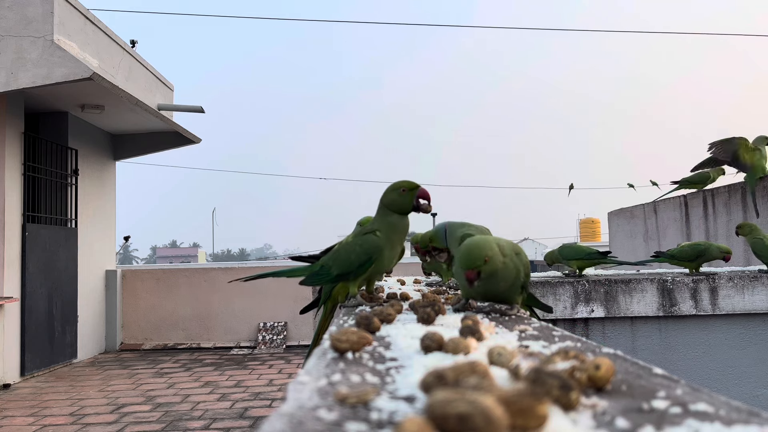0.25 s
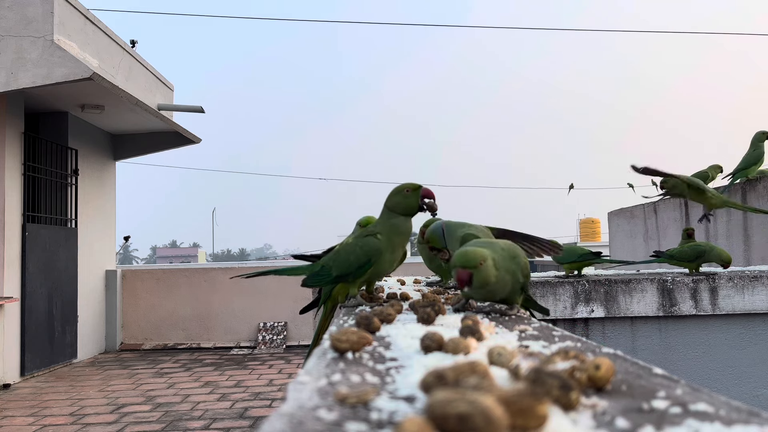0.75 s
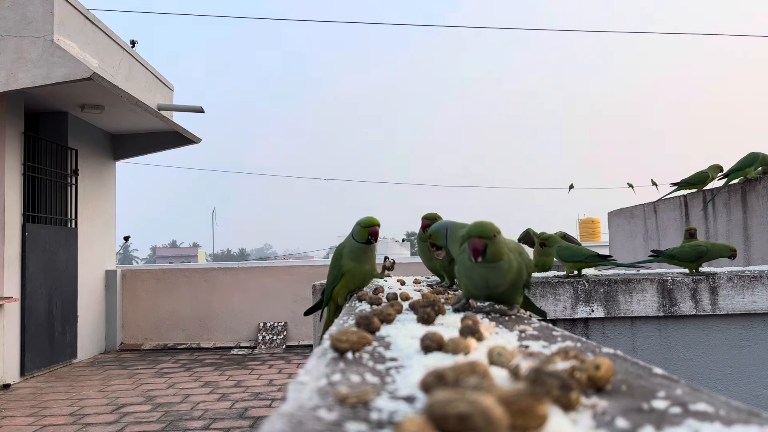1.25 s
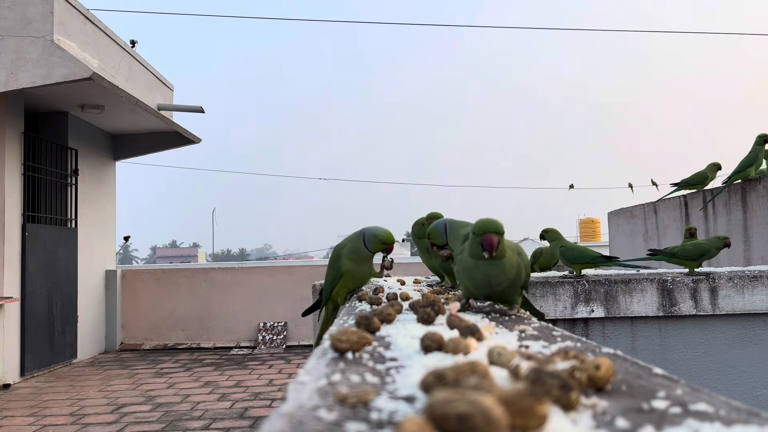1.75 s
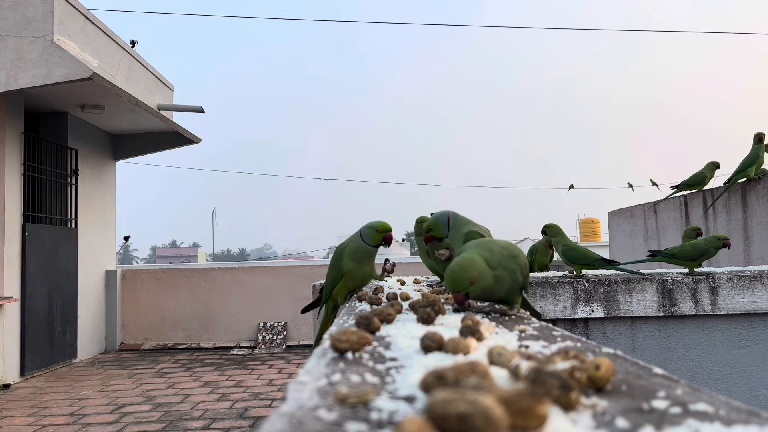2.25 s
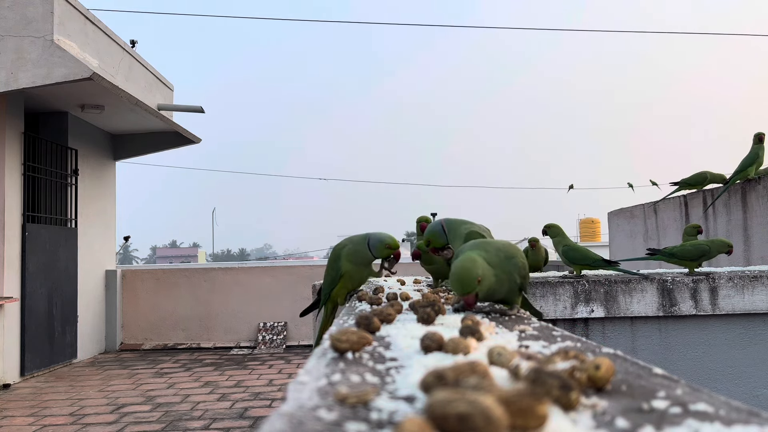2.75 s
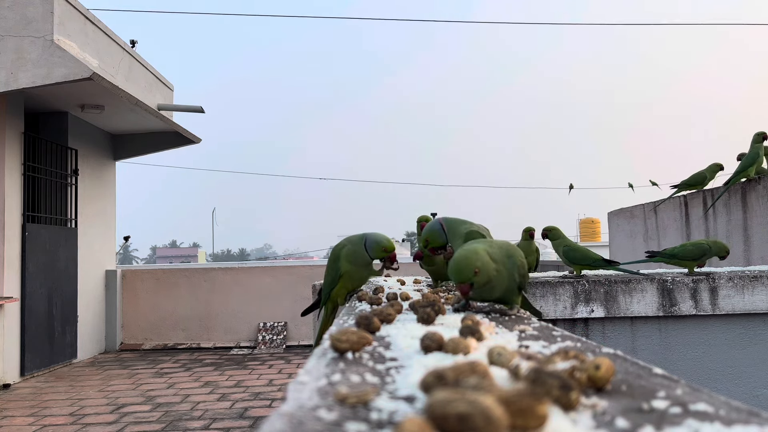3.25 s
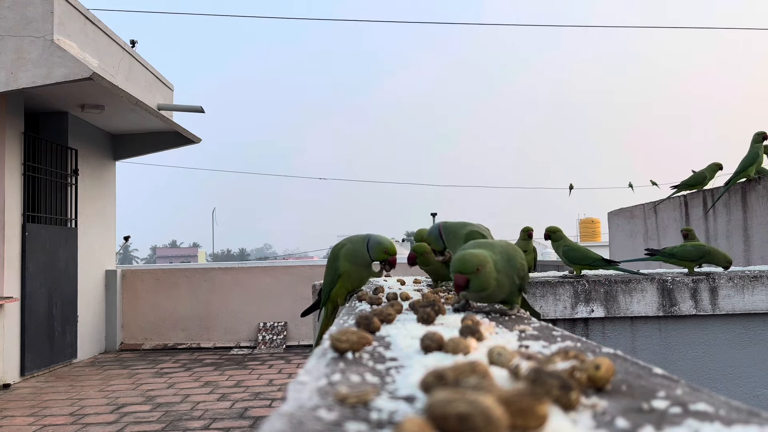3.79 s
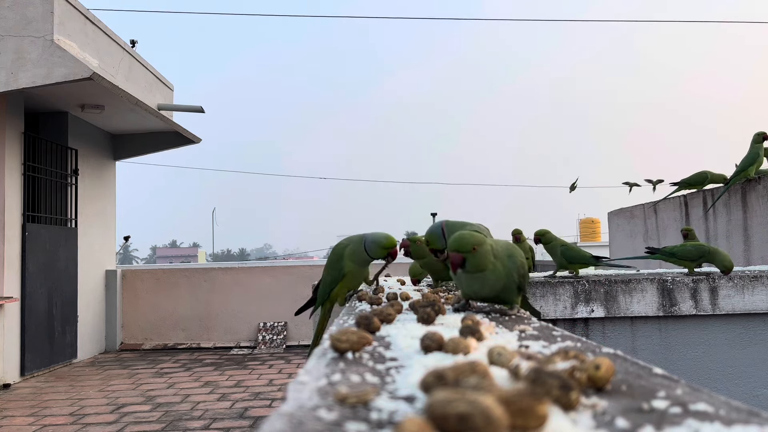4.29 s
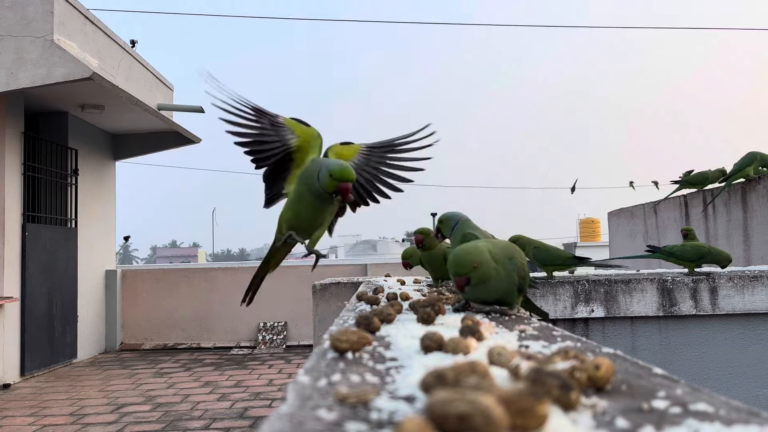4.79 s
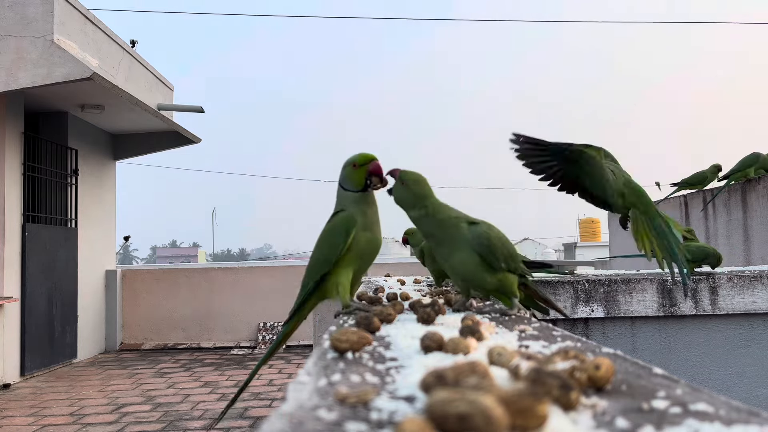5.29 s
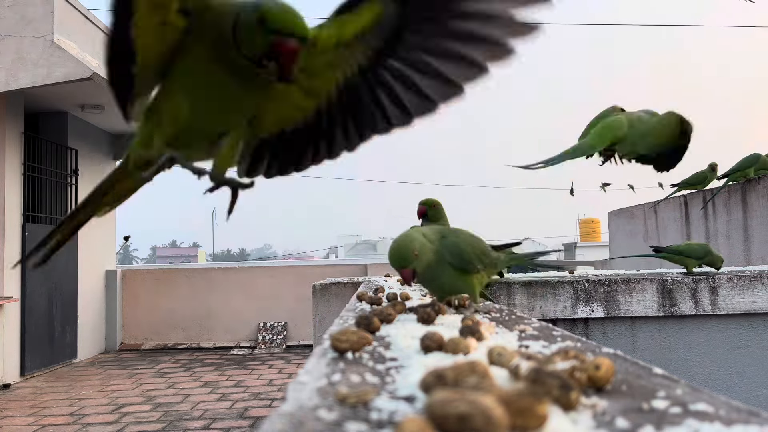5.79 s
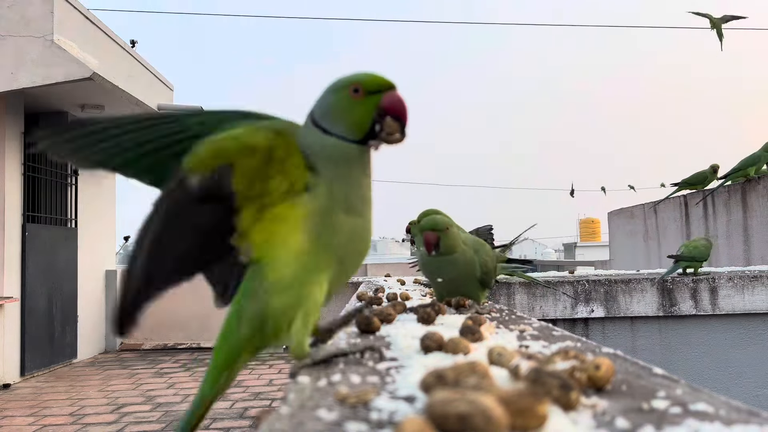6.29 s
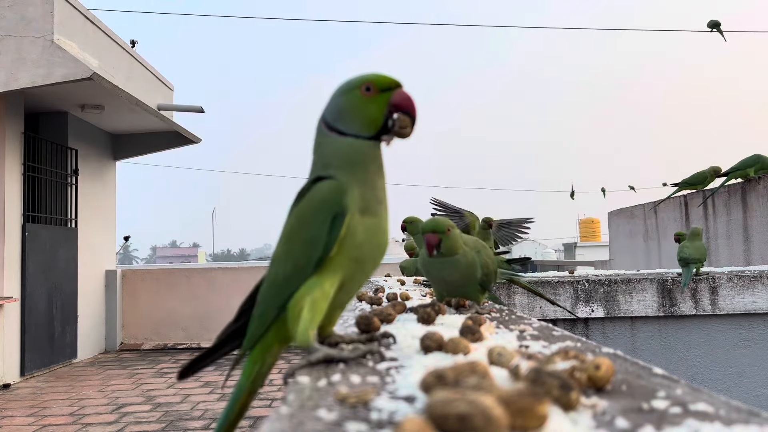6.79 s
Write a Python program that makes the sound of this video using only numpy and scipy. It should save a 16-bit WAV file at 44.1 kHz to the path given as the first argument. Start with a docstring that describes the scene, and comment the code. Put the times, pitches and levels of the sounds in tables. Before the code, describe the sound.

Parakeets feeding on a rooftop crack nuts and give harsh rattling squawks, with wing flurries and a burst of piercing screams near the end.

```python
"""A town hums under a lumpy draught; a brief falling croak, far chirps and beak cracks follow, then parakeets.
Squawks are bursts of throat-coloured partials and breath; whistles and croaks are gliding, blurred tones.
Cracks and knocks are decaying noise and sines; wings, feathers, draught and hum are patchy stereo noise.
Echoes and decaying noise tails answer for the walls; two microphone ports hear near sounds unequally."""
import sys
import numpy as np
from scipy import signal
from scipy.fft import rfft, irfft, next_fast_len
from scipy.io import wavfile
from scipy.ndimage import uniform_filter1d, map_coordinates

SR = 44100
rng = np.random.default_rng(int(sys.argv[2]) if len(sys.argv) > 2 else 0)


def unload_audio(sound):
    """Save the sound as a 16-bit wav file, at the path given as the first command line argument."""
    columns = np.transpose(np.atleast_2d(sound))
    # keep every value between -1 and 1, then stretch to whole-number steps
    steps = np.round(np.clip(columns, -1, 1) * 32767)
    wavfile.write(sys.argv[1], SR, steps.astype(np.int16))


N = 310464  # samples

# Gusts and wing draught: (time [s], relative level [dB])
DRAUGHT_LEVELS = [(0, -47.5), (.6, -68), (1.06, -37.5), (1.45, -46.5), (1.56, -40), (1.74, -61),
                  (1.88, -41), (2.16, -56.5), (4.41, -50), (4.78, -39.5), (5.2, -47.5), (5.43, -40.5),
                  (5.61, -38.5), (5.84, -29.5), (5.9, -41), (6.14, -40), (6.31, -41), (7.04, -50)]
# Feather rustle: (time [s], level before flutter [dB])
RUSTLE_LEVELS = [(0, -56), (.3, -70), (.62, -70.5), (.9, -61.5), (1.4, -55), (2.2, -69), (2.801, -69),
                 (3.3, -65.5), (4.3, -67), (4.6, -56.5), (5.2, -61), (5.7, -54.5), (6.7, -55.5),
                 (7.04, -58)]
# Noise spectra: (frequency [Hz], relative density [dB per Hz])
TOWN_SPECTRUM = [(35, -69), (60, 2.5), (172, -5), (228, -5.5), (495, -13), (783, -13.5), (937, -15.5),
                 (1400, -19), (2000, -29.5), (2640, -26), (3090, -18.5), (3850, -35), (4700, -19.5),
                 (7000, -103), (15400, -120)]
DRAUGHT_SPECTRUM = [(15, -12), (30, -3.5), (55, 8), (85, -1), (125, -3.5), (250, -10.5), (450, -60)]
FEATHER_SPECTRUM = [(300, -52), (1500, 14), (4500, 13.5), (6200, -2), (8500, 11), (10300, -11.5),
                    (12500, 9), (14000, -11), (16000, -55)]
WING_AIR_SPECTRUM = [(150, 5.5), (600, 9), (1500, 2), (4000, -15)]
BREATH_SPECTRUM = [(530, -68), (900, -16), (1460, -8), (1850, -13), (2400, 1), (3600, 6), (4200, 2),
                   (4700, -9), (5400, -17), (7320, -25), (10300, -30), (12900, -15), (15000, -37)]
# Left-right likeness of noise: (frequency [Hz], correlation [-1 to 1])
STEREO_LIKENESS = [(30, 1), (60, 0.97), (150, 1), (380, 0.73), (950, 0.37), (2400, 0.63), (6000, 0),
                   (15000, 0.22)]

# A falling croak, then whistled screams: ((roughness [rad], throb [dB]),
#   (odd partials [dB], left-right [dB]), rows of (time [s], pitch [Hz], level [dB]))
CROAK_AND_WHISTLES = [ ((0, 0), (0.93, -1), [(.002, 636, -67), (.025, 553, -49.5), (.055, 528, -71)]),
                      ((.24, 3), (-6, 0), [(5.83, 1473, -33), (5.843, 2166, -27.5), (5.855, 2185, -22.5),
                      (5.863, 1846, -30), (5.88, 1875, -27.5), (5.9, 1990, -29.5), (5.92, 1850, -35.5),
                      (5.93, 1663, -26), (5.952, 1633, -36.5)]), ((.22, 3), (-14, 0), [(5.86, 2130, -40),
                      (5.9, 2250, -29), (5.912, 2010, -38), (5.922, 1930, -40), (5.93, 2190, -34),
                      (5.945, 2250, -39)]), ((.18, 2.5), (-5, 0.57), [(6.06, 1894, -22), (6.071, 2260, -22),
                      (6.087, 2420, -28.5), (6.093, 2356, -25), (6.1, 2260, -21), (6.122, 2241, -22),
                      (6.145, 2127, -25.5), (6.168, 1913, -28.5), (6.187, 1450, -33)]), ((.13, 2),
                      (-1.3, -3.5), [(6.355, 1676, -35.5), (6.373, 2233, -28), (6.386, 2287, -24.5),
                      (6.4, 2320, -32), (6.415, 2351, -32), (6.44, 2264, -27.5), (6.455, 2110, -30),
                      (6.479, 1880, -32), (6.5, 1473, -34)]), ((.6, 4), (-3.1, -1.5), [(6.8, 1496, -33),
                      (6.812, 1478, -41), (6.82, 1900, -33), (6.83, 2520, -17.5)]), ((.1, 3.5), (8, 3),
                      [(6.824, 3360, -23), (6.853, 3216, -32.5), (6.864, 3085, -34), (6.93, 3170, -58)]),
                      ((.07, 1.5), (-4, -9), [(6.848, 2437, -21), (6.858, 2130, -35), (6.886, 2177, -28),
                      (6.897, 2095, -30.5), (6.905, 1996, -39), (6.928, 1976, -29.5), (6.966, 1398, -36)]),
                      ]
# Soft croaks: columns as CROAK_AND_WHISTLES
SOFT_CROAKS = [((0, 0), (0, 0), [(.72, 610, -49), (.765, 350, -52)]), ((0, 0), (0, 2), [(3.668, 680, -46),
               (3.682, 490, -44), (3.692, 460, -44), (3.704, 510, -45), (3.72, 800, -48)])]
# Throat colours: (frequency [Hz], relative gain [dB])
WHISTLE_THROAT = [(1400, -21), (2200, -12), (3400, 0), (4600, -1), (5300, -8), (6200, -16), (7300, -25),
                  (8700, -15), (9500, -20), (10300, -46), (14000, -52)]
CROAK_THROAT = [(300, -8), (500, -1), (1300, -1), (1800, -9), (2400, -18), (4000, -36)]
SQUAWK_THROAT = [(500, -7), (1500, 3), (2300, -3.5), (3100, 3.5), (3800, -4), (4700, -5), (6500, -20),
                 (8500, -9), (10300, -23.5), (12400, -18), (15000, -55)]
ATTACK_S, RELEASE_S = 0.01, 0.0085  # whistles and croaks

# Far chirps: (time [s], first pitch [Hz], level [dB])
CHIRPS = [(.069, 5076, -50), (0.625, 4900, -49), (1.279, 4830, -47), (2.05, 4835, -49),
          (4.086, 4900, -48.5)]
CHIRP_S, CHIRP_FALL_HZ = 0.084, 587
# Faint steady notes: (time [s], pitch [Hz], length [s], level [dB])
HOOTS = [(.1, 480, 0.046, -46), (0.403, 3340, 0.049, -56), (2.835, 3000, 0.12, -59),
         (4.33, 1350, 0.21, -53), (4.25, 906, 0.1, -55.5)]

# Beak cracks: (time [s], bright edge level [dB], relative ring [dB], relative body [dB])
CRACKS = [(0.164, -34.5, -4, -9), (1.093, -58.5, -2, 20), (1.244, -36.5, -4.5, -24),
          (1.297, -32.5, -1.5, -11.5), (1.404, -57, 17, 6), (2.607, -45.5, -44, 1), (2.7927, -28.5, 4, -37),
          (3.217, -53, 4, 11), (3.308, -51, 5.5, -12), (3.391, -48.5, 6, -6), (3.563, -34.5, -14, -5),
          (3.945, -43, 13, -28), (3.9786, -36, -0.5, -10), (6.619, -32.5, 2, -27), (6.6234, -35, 1, -18),
          (6.63, -43, 15, -2), (6.7856, -55, 14, 8)]
# Hollow beak resonances: (centre [Hz], width [Hz], relative gain [dB])
BEAK_MODES = [(2920, 410, 21), (4500, 295, 20.5)]
# Feet and nuts on the wall: (time [s], relative level [dB], ring pitch [Hz])
KNOCKS = [(0.444, -38.5, 254), (1.032, -30, 633), (1.28, -36.5, 600), (1.877, -42, 235),
          (2.173, -37.5, 226), (2.599, -41.5, 240), (3.385, -36.5, 247), (5.073, -29, 258),
          (5.549, -38.5, 222), (6.619, -33.5, 840)]
# Flights: (first stroke [s], last stroke [s], nominal rate [strokes/s], relative level [dB],
#   growth of low part [dB/stroke], treble [dB])
FLIGHTS = [(0.923, 1.171, 11.9, -29, 0, -9.5), (5.056, 5.344, 11.1, -42.5, 2.5, -3.5),
           (5.386, 5.469, 11.6, -28, -0.5, -15), (5.512, 5.805, 13.6, -30.5, 1, -34)]

# Squawks: (rhythm rows of (time [s], bursts so far),
#   voice (half-pitch partials at start [dB], at end [dB], treble [dB], breath [dB], pitch scatter [share]),
#   rows of (time [s], first partial [dB], pitch [Hz], upper partials [dB], burst sharpness))
SQUAWKS = [ ([(.964, 0), (1.096, 15)], (3.5, 5.5, -11, -11, .015), [(.968, -60, 1585, 2, 2.5),
           (1.0, -59, 1608, 7.5, 2.5), (1.09, -67.5, 1610, 6.5, 3.7)]), ([(1.446, 0), (1.485, 4),
           (1.601, 16), (1.779, 34), (1.843, 40)], (-5, -2.5, -4, 1.5, .03), [(1.459, -66, 1715, 19, 0.77),
           (1.51, -58.5, 1555, 17, 1), (1.56, -51.5, 1570, 19.5, 1.24), (1.625, -55, 1580, 25, 1.5),
           (1.68, -54, 1545, 22.5, 0.71), (1.79, -54.5, 1534, 16, 2.2), (1.84, -68, 1550, 1, 1.2)]),
           ([(2.8995, 0), (2.956, 6), (3.049, 16), (3.098, 21), (3.118, 23)], (-6, -4, -1, -1, .025),
           [(2.904, -66, 1634, 21, 2.1), (2.92, -54.5, 1590, 21, 2.1), (2.96, -49, 1602, 19.5, 1.4),
           (3.03, -53, 1561, 21.5, 2), (3.1, -59, 1562, 17, 3.7), (3.108, -75, 1570, 18, 1.4)]),
           ([(4.459, 0), (4.504, 6), (4.556, 14), (4.58, 17), (4.689, 32), (4.765, 42), (4.803, 46),
           (4.899, 56), (4.931, 59), (5.044, 68)], (-15, -7.5, -5.5, -8, .025),
           [(4.465, -57, 1332, -9, 0.94), (4.548, -55.5, 1421, -5, 0.94), (4.566, -48.5, 1475, 2, 1.9),
           (4.645, -51, 1447, 4.5, 2.4), (4.7, -54.5, 1373, 11.5, 0.63), (4.765, -52.5, 1311, 6.5, 0.67),
           (4.84, -49, 1366, 8.5, 1.15), (4.91, -51.5, 1240, 6, 2.3), (4.955, -49.5, 1095, -8, 6.2),
           (5.032, -57, 1038, -3, 3), (5.043, -83, 1014, -12, 2.5)]), ([(5.791, 0), (5.894, 13),
           (5.998, 25), (6.103, 37), (6.206, 47), (6.324, 59), (6.441, 70), (6.521, 77)],
           (-9.5, -9, -5, -11, .02), [(5.795, -48, 1352, -5, 5.1), (5.81, -51, 1415, 5, 0.88),
           (5.967, -45, 1335, 4.5, 4.9), (6.06, -50, 1060, -3.5, 4.8), (6.195, -46.5, 998.5, 2, 2.3),
           (6.49, -49.5, 1090, -5, 5.9), (6.515, -77, 990, -1, 1.3)]), ]
BURST_JITTER_CYCLES, BURST_SCATTER_DB, BURST_SKEW = .05, 1.4, .5  # skew 0-1: rise faster than fall
TONE_BLUR_RAD, BURST_GLIDE = 0.1, .03  # blur of first partial; pitch fall across a burst [share]

# Wall decay: (frequency [Hz], t60 before scaling [s])
WALL_DECAY = [(300, 0.34), (3000, 0.62), (6000, 0.54), (12000, 0.26)]
# Near sounds at the ports: (frequency [Hz], left-right [dB])
PORT_LEVEL = [(60, -1), (150, 4), (380, -6.5), (950, 3), (2380, -2.5), (5980, -3.5), (15000, 3)]
# Near sounds at the ports: (frequency [Hz], left lead [rad])
PORT_LEAD = [(1, 7.5), (700, -1.05), (2400, 1.5), (4200, -1.8), (5200, -1.5), (6800, -1.5), (9700, 2),
             (13400, 8), (16300, 10.5)]
SCREAM_ECHO_DB, SQUAWK_ECHO_DB = -3.5, -8
WALL_TOP_HZ, TOP_HZ = 9500, 16300


def amp(db):
    """Decibels to amplitude."""
    return 10 ** (np.asarray(db) / 20)


def unit(x):
    """Scale to rms 1."""
    return x / np.sqrt(np.mean(x ** 2) + 1e-20)


def along(points, hz):
    """Interpolate (Hz, value) points on a log axis."""
    f, v = np.transpose(points)
    return np.interp(np.log(hz + 1), np.log(f + 1), v)


def curves(rows):
    """First sample of a table, and one value per sample for each column."""
    s, *cols = np.transpose(rows)
    n = np.arange(round(s[0] * SR), min(round(s[-1] * SR), N + SR))
    return n[0], [np.interp(n / SR, s, c) for c in cols]


def wobble(rate_hz, size=N):
    """Smooth random curve, rate_hz knots a second."""
    knots = rng.standard_normal(int(size * rate_hz / SR) + 4)
    return map_coordinates(knots, [np.arange(size) * rate_hz / SR])


def filtered(x, response):
    """Apply a complex response of frequency."""
    m = next_fast_len(x.shape[-1] + 8192)
    spectrum = rfft(x, m) * response(np.fft.rfftfreq(m, 1 / SR))
    return irfft(spectrum, m)[..., :x.shape[-1]]


def add(track, first, x):
    """Mix x into track from sample first."""
    track[..., first:first + x.shape[-1]] += x


def rush(spectrum, patchy_db):
    """Stereo noise of rms 1, with random gain patches and partly shared channels."""
    z = signal.stft(rng.standard_normal((2, N)), nperseg=512)[2]
    field = uniform_filter1d(rng.standard_normal(z.shape[1:]), size=5, axis=0)
    field = uniform_filter1d(field, size=10, axis=1)
    pair = signal.istft(z * amp(patchy_db * unit(field)), nperseg=512)[1][:, :N]

    def mid_side(hz):
        turn = np.arccos(np.clip(along(STEREO_LIKENESS, hz), -1, 1)) / 2
        return amp(along(spectrum, hz)) * [np.cos(turn), np.sin(turn)]

    mid, side = filtered(pair, mid_side)
    return unit(np.array([mid + side, mid - side]))


def stack(hz, gains, blur_rad, blur_rate_hz):
    """Harmonics of a pitch whose phases wander, more so the higher they are."""
    k = np.arange(1, len(gains) + 1)[:, None]
    drift = np.array([wobble(blur_rate_hz, size=len(hz)) for _ in gains])
    wander = blur_rad * k * np.sqrt(k) * drift
    start = rng.uniform(0, 2 * np.pi, k.shape)
    phase = k * 2 * np.pi * np.cumsum(hz) / SR + start + wander
    return np.sum(gains * np.sin(phase), axis=0) * np.sqrt(2)


def background():
    """Town hum, lumpy low draught and the rustle of the flock, each shaped noise."""
    t = np.arange(N) / SR
    draught_db = np.interp(t, *np.transpose(DRAUGHT_LEVELS))
    rustle_db = np.interp(t, *np.transpose(RUSTLE_LEVELS))
    hum = amp(-50.0 + 0.41 * wobble(1.813)) * rush(TOWN_SPECTRUM, patchy_db=1.5)
    flutter_db = 2.2 * wobble(14) + 1.5 * wobble(60)
    rustle = amp(rustle_db + flutter_db) * rush(FEATHER_SPECTRUM, patchy_db=2.5)
    draught = amp(draught_db - 5.5 + 2.2 * wobble(11)) * rush(DRAUGHT_SPECTRUM, patchy_db=1.3)
    return hum * amp([[-.6], [.6]]) + rustle + draught  # hum leans right


def croaks_and_whistles(calls, throat, breath_db):
    """Throat-coloured partials; rough calls smear and carry breath, and throb has its own depth."""
    out = np.zeros((2, N + SR))
    for (rough_rad, throb_db), (odd_db, pan_db), rows in calls:
        first, (hz, db) = curves(rows)
        t = np.arange(len(hz)) / SR
        shape = np.minimum(1, np.minimum(t / ATTACK_S, t[::-1] / RELEASE_S)) * amp(db)
        k = np.arange(1, 11)[:, None]
        gains = amp(along(throat, k * hz) + odd_db * (k % 2)) * (k * hz < TOP_HZ)
        gains = gains / np.sqrt(np.sum(gains ** 2, axis=0))
        unsteady_hz = hz * (1 + .002 * wobble(150, size=len(hz)))
        tone = stack(unsteady_hz, gains, blur_rad=rough_rad, blur_rate_hz=350)
        hiss = unit(filtered(rng.standard_normal(len(hz)), lambda f: amp(along(throat, f))))
        throb = amp(throb_db * (np.sin(2 * np.pi * 115 * t) + .7 * wobble(200, size=len(hz))))
        voice = (tone + rough_rad * amp(breath_db) * hiss) * shape * throb
        add(out, first, voice * amp([[pan_db / 2], [-pan_db / 2]]))
    return out[:, :N]


def far_chirps_and_horns():
    """Sine notes that hold, like a far horn, or waver and slide down like far chirps; the walls carry them
    here."""
    out = np.zeros(N + SR)
    notes = [(s, hz, CHIRP_FALL_HZ, CHIRP_S, db) for s, hz, db in CHIRPS]
    notes += [(s, hz, 0, length_s, db) for s, hz, length_s, db in HOOTS]
    for s, first_hz, fall_hz, length_s, db in notes:
        u = np.linspace(0, 1, round(length_s * SR))
        hz = first_hz - fall_hz * u ** 2.5 + .25 * fall_hz * wobble(120, size=len(u))
        swell = amp(db) * np.sin(np.pi * u ** 0.78)
        add(out, round(s * SR), swell * np.sin(2 * np.pi * np.cumsum(hz) / SR))
    return out[:N]


def resonance(f, centre_hz, width_hz):
    """Band-pass response of one damped resonance."""
    return 1j * f * width_hz / (centre_hz ** 2 - f * f + 1j * f * width_hz)


def cracks():
    """Noise falling 60 dB in 10 ms excites a bright edge, the hollow beak and the nut's low body."""
    out, t = np.zeros(N + SR), np.arange(SR // 40) / SR

    def edge(f):
        return resonance(f, 8800, 6000)

    def ring(f):  # modes alternate in sign
        return sum((-1) ** k * amp(db) * resonance(f, centre_hz, width_hz)
                   for k, (centre_hz, width_hz, db) in enumerate(BEAK_MODES))

    def body(f):
        return resonance(f, 1350, 600)

    for s, db, ring_db, body_db in CRACKS:
        snap = amp(-60 * t / 0.01) * rng.standard_normal(len(t))
        for colour, part_db in ((edge, 0), (ring, ring_db + 3.5), (body, body_db + 7.0)):
            part = filtered(snap, colour)
            add(out, round(s * SR), amp(db + part_db) * part / np.abs(part).max())
    return out[:N]


def knocks():
    """A dull 550 Hz tap, then a soft ring falling 60 dB in fifteen cycles."""
    out, t = np.zeros(N + SR), np.arange(SR // 8) / SR
    for s, db, hz in KNOCKS:
        tap = amp(db - 8.0 - 60 * t / 0.011) * np.sin(2 * np.pi * 550 * t)
        onset = 1 - np.exp(-t * hz / 1.75)
        ring = amp(db + 6.0 - 60 * t * hz / 15) * onset * np.sin(2 * np.pi * hz * t)
        add(out, round(s * SR), tap + ring)
    return out[:N]


def wings():
    """Each stroke is a swish of air and feathers that rises and falls in some 40 ms."""
    low, high = np.zeros(N + SR), np.zeros(N + SR)
    u = np.arange(SR // 8) / SR / 0.017  # time over the 17 ms rise
    swish = u * np.exp(1 - u)
    for first_s, last_s, rate_hz, db, growth_db, treble_db in FLIGHTS:
        strokes_s = np.linspace(first_s, last_s, round((last_s - first_s) * rate_hz) + 1)
        for k, s in enumerate(strokes_s):
            add(low, round(s * SR), amp(db + growth_db * k - 20.5) * swish)
            add(high, round(s * SR), amp(db - 13.5 + treble_db) * swish)
    air = low[:N] * rush(WING_AIR_SPECTRUM, patchy_db=3)
    return air + high[:N] * rush(FEATHER_SPECTRUM, patchy_db=3)


def squawks():
    """The syrinx sounds in bursts of a few ms; half-pitch partials and breath make it harsh."""
    out = np.zeros(N + SR)
    for rhythm, (half_db, half_end_db, treble_db, breath_db, scatter), rows in SQUAWKS:
        first, (db, hz, upper_db, sharp) = curves(rows)
        count = np.interp((first + np.arange(len(hz))) / SR, *np.transpose(rhythm))
        cycle = count + .5 + BURST_JITTER_CYCLES * wobble(60, size=len(hz))
        draws = rng.standard_normal((int(cycle.max()) + 1, 2))  # one pair per burst
        size, detune = draws[cycle.astype(int)].T
        sharp = np.abs(sharp)
        dip = np.cos(2 * np.pi * cycle) + 1
        pulse = np.exp(-sharp * (np.cos(2 * np.pi * cycle - BURST_SKEW * dip) + 1))
        # sharper bursts are raised to offset their shortness
        burst = pulse * (1 + 4 * np.pi * sharp) ** .25 * amp(BURST_SCATTER_DB * size)
        half_hz = hz / 2 * (1 + scatter * detune + BURST_GLIDE * np.sin(2 * np.pi * cycle))

        def lift_db(f):  # treble shelf, 4300-4800 Hz
            return treble_db * np.clip(f / 500 - 8.6, 0, 1)

        k = np.arange(1, 19)[:, None]  # multiples of half the pitch
        level_db = along(SQUAWK_THROAT, k * half_hz) + lift_db(k * half_hz) + upper_db * (k > 2)
        level_db = level_db + np.linspace(half_db, half_end_db, len(hz)) * (k % 2)
        tone = stack(half_hz, amp(level_db), blur_rad=TONE_BLUR_RAD, blur_rate_hz=300)
        noise = burst * rng.standard_normal(len(hz))
        hiss = unit(filtered(noise, lambda f: amp(along(BREATH_SPECTRUM, f) + lift_db(f))))
        add(out, first, amp(db) * (burst * tone + amp(upper_db + breath_db) * hiss))
    return out[:N]


def walls(x, gap_s, echoes, longer):
    """Single echoes (time [s], level [dB]) and a tail where each frequency dies at its own speed."""
    hz, t, z = signal.stft(rng.standard_normal((2, SR)), SR, nperseg=256)
    decay = amp(-60 * t / longer / along(WALL_DECAY, hz)[:, None])
    tail = signal.istft(z * decay, SR, nperseg=256)[1]
    tail = np.pad(tail / np.linalg.norm(tail[0]), ((0, 0), (round(gap_s * SR), 0)))
    for side, (s, db) in enumerate(echoes):
        tail[side % 2, round(s * SR)] += amp(db)
    return signal.fftconvolve(x[None], tail, axes=1)[:, :N]


def ports(x):
    """Two microphone ports hear a near source with their own level and phase."""
    def response(f):
        level = amp(np.outer([.5, -.5], along(PORT_LEVEL, f)))
        return level * np.exp(1j * np.outer([.5, -.5], along(PORT_LEAD, f)))

    return filtered(x, response)


def scene():
    """Near sounds through the ports, wall answers, far chirps and horn notes, wings and background."""
    harsh = squawks()
    small = cracks() + knocks()
    clear = croaks_and_whistles(CROAK_AND_WHISTLES, WHISTLE_THROAT, breath_db=-3)
    soft_croaks = croaks_and_whistles(SOFT_CROAKS, CROAK_THROAT, breath_db=-13)
    # rough walls return little treble
    dull = filtered(clear.mean(axis=0), lambda f: 1 / (1 + (f / WALL_TOP_HZ) ** 4))
    harsh_answer = walls(harsh + amp(-10) * small, .019, [(.0185, -9), (.02, -9)], longer=1.13)
    scream_answer = walls(dull, 0.0055, [(.014, -8.5), (.015, -3)], longer=0.87)
    answer = amp(SQUAWK_ECHO_DB) * harsh_answer + amp(SCREAM_ECHO_DB) * scream_answer
    far = walls(far_chirps_and_horns(), 0.004, [(.001, -9.5), (.002, 3)], longer=2.7)
    return ports(harsh + small + clear) + soft_croaks + answer + far + wings() + background()


def record(dry):
    """The phone keeps nothing above its band limit."""
    return filtered(dry, lambda hz: hz < TOP_HZ)


dry = scene()
out = record(dry)
unload_audio(out)
```